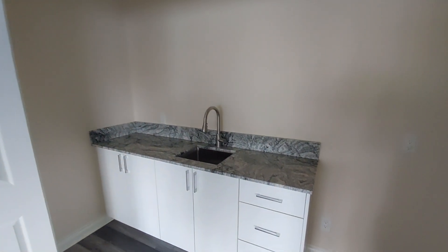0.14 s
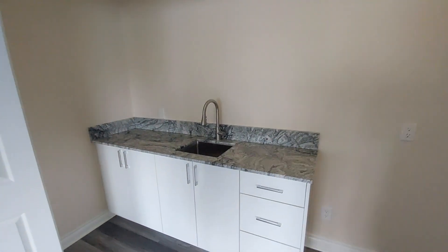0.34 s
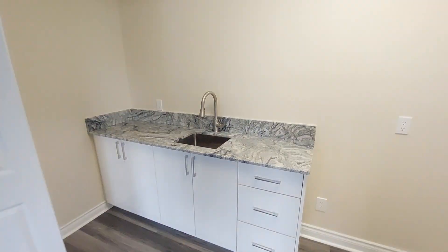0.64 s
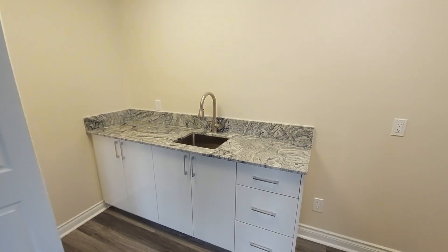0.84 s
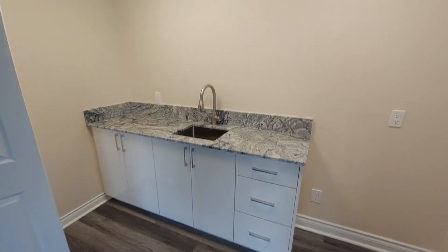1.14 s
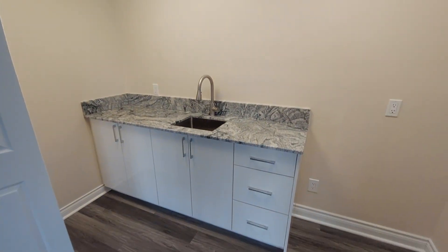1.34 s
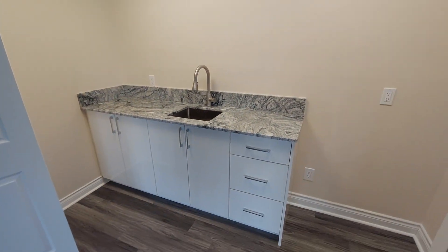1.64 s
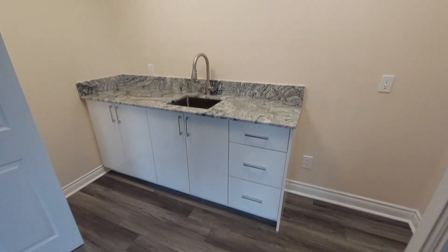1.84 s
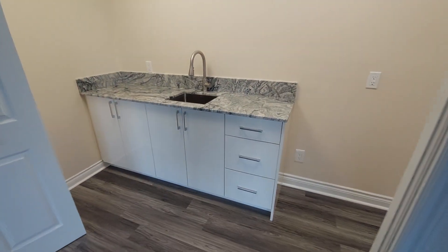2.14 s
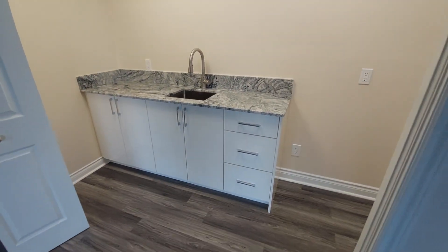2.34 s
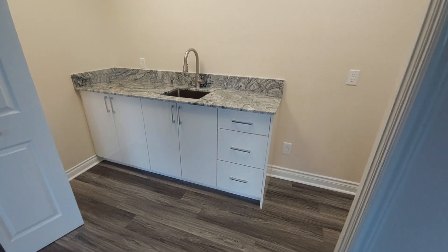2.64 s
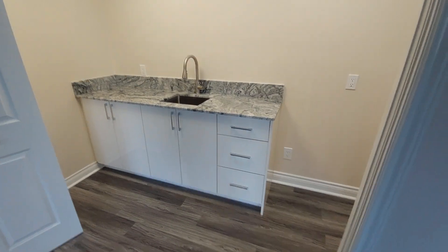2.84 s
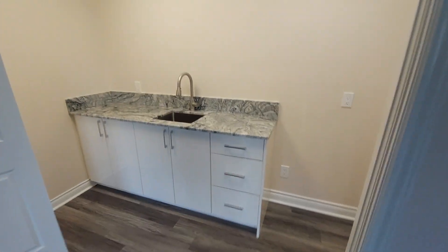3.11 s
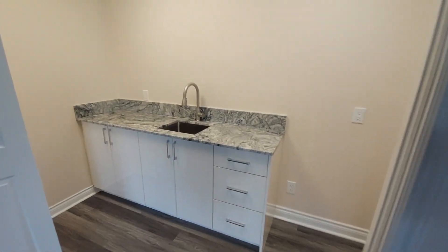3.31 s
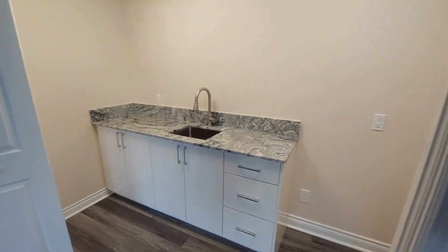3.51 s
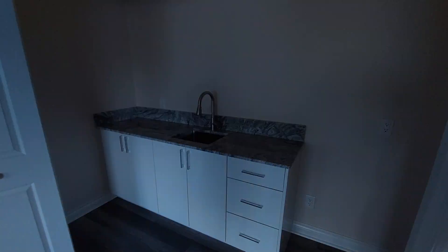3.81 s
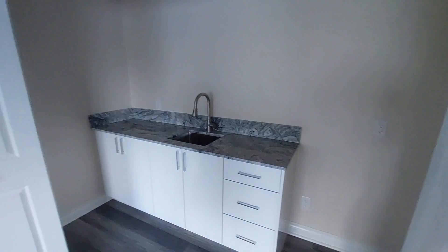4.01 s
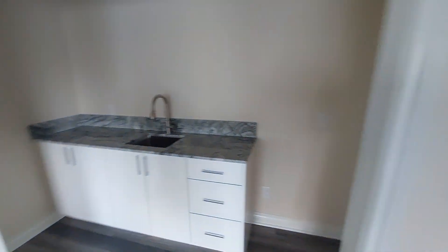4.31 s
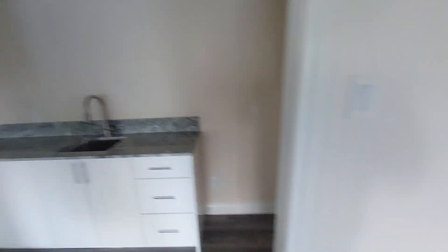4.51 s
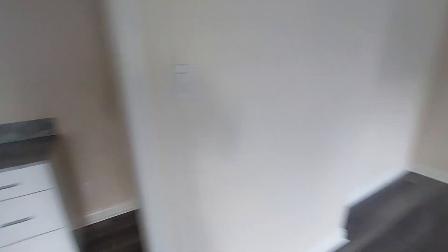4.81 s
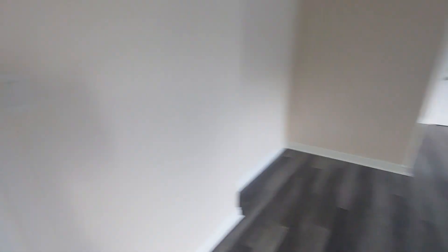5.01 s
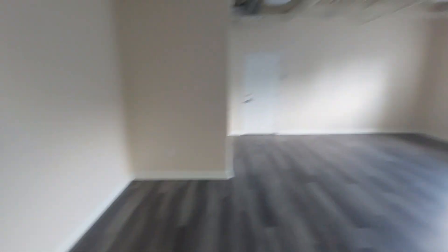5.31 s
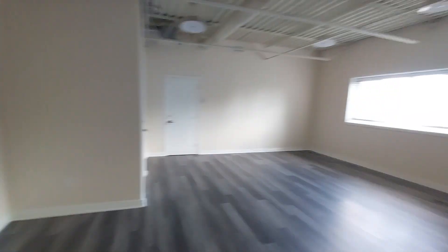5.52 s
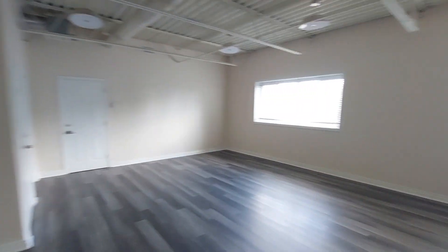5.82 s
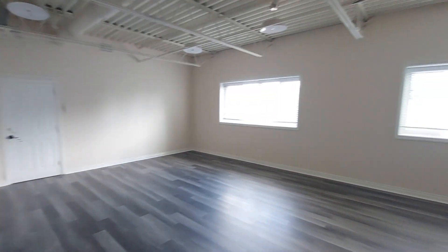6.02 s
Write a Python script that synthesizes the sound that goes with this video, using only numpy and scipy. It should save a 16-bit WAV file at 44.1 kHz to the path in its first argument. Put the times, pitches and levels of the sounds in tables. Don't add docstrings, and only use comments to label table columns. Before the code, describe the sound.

Close plastic clicks and skin rubs over faint hiss and hum, then steps, a wall switch snapping off, cloth rustle and one loud handling tap.

```python
import sys
import numpy as np
from scipy import signal
from scipy.fft import rfft, irfft
from scipy.io import wavfile
from scipy.ndimage import uniform_filter1d

SR = 44100
rng = np.random.default_rng(int(sys.argv[2]) if len(sys.argv) > 2 else 0)


def volts_from_decibels(level):
    exponent = np.asarray(level, float) / 20
    return 10 ** exponent


def master(y):
    cut = np.clip(np.atleast_2d(y).T, -1, 1)
    pcm = np.round(cut * 32767)
    wavfile.write(sys.argv[1], SR, pcm.astype(np.int16))


N = 271215
LEAD = 22050

# frequency in Hz, level in dB per Hz.
FLOOR_COLOUR = [(25, -29), (53, -17), (90, -25), (200, -21.5), (330, -28), (630, -39.5), (2000, -41),
                (5700, -58), (9500, -50), (12500, -63), (16000, -65)]
# frequency in Hz, width in Hz, level in dB.
MOTOR_LINES = [(113.4, 14, -68.5), (274, 57, -85)]
# time in seconds, hum gain in dB.
MOTOR_FADE = [
    (0, -1.5),
    (1.5, 0),
    (2.6, 2),
    (3.6, 4),
    (4.2, -0.5),
    (4.8, -8),
    (6.15, -12),
]
FLOOR_DB, TONE_HZ, TONE_DB = -71, 240.3, -73
# frequency in Hz, left-right correlation.
PORT_LIKENESS = [(60, 0.86), (240, 0.95), (950, -0.071), (3770, 0.092), (15000, -0.12)]
# frequency in Hz, left over right in dB.
PORT_BALANCE = [(60, 11), (180, 6.5), (550, 1), (1650, 5), (4970, 5), (15000, -1.5)]
# frequency in Hz, t60 in seconds.
ROOM_T60 = [(130, 1.3), (260, 0.86), (520, 0.85), (1000, 1.29), (2000, 2.05), (4000, 1.554), (8000, 0.97),
            (16000, 0.54)]

# frequency in Hz, level in dB per Hz.
CLOTH_COLOUR = [(1500, -4.5), (3300, -5.5), (4200, -1), (7500, -2.5), (9200, -9.5), (12500, -2.5),
                (15500, -4), (16500, -30.5)]
# fullest brush in seconds, level in dB, rise in dB per second, left over right in dB.
SWINGS = [(0, -71.5, 516, -4), (.92, -76, 55, 11.5), (1.85, -63.5, 693.5, 5.5), (2.1, -60, 791, 1.5),
          (2.45, -75, 60, 2), (2.7, -91, 60, 8), (3.0, -72, 77, 1), (3.3, -71, 8, 3), (3.52, -66.5, 102, 6),
          (3.7, -58, 128, -2), (4.24, -62.5, 150, -6), (4.58, -59.5, 904, -11.5), (4.88, -56, 400, 0.5),
          (5.14, -68, 100, 25), (5.6, -60, 122, 4.5), (5.73, -63.5, 160, 2), (5.945, -51.5, 996, 6.5),
          (6.04, -55, 187, 0.5)]
SWING_FALL_DB_PER_S, STILL_DB = 51, -85.5

# start in seconds, peak in dB, pitch in Hz, t60 in seconds.
THUDS = [(1.24, -59, 50, .9), (1.42, -58, 47, .5), (1.97, -59, 47, .4), (4.0, -56, 60, .5),
         (2.215, -31, 68, 0.19), (2.277, -35, 61.5, 0.1), (2.655, -41, 56.6, 0.064), (2.873, -45, 95, 0.22),
         (2.931, -35.5, 102, 0.12), (3.593, -43.5, 57.7, 0.45), (3.843, -37, 55, 0.29),
         (4.482, -43, 61.4, 0.15), (4.549, -43, 65.4, 0.11), (5.07, -52, 60.3, 0.7),
         (5.298, -56, 54.6, 0.43), (5.562, -40.5, 59, 0.13)]
# time in seconds, level in dB, heel boom in dB, sole brightness in dB, contact in seconds.
FOOTFALLS = [(2.0787, -29, -0.5, -8.5, 0.00029), (3.072, -50.5, 13, 9.5, 0.0016),
             (3.836, -32.5, 8.5, -11, 0.0091), (4.46, -48, 5.5, 0.5, 0.0042), (4.58, -49, -23, 10.5, 0.04),
             (4.76, -52.5, -19, 8.5, 0.04), (4.87, -47, -9, 3, 0.032), (5.2918, -38, 0.5, -4.5, 0.00044),
             (5.56, -49.5, -10, 3.5, 0.036), (5.69, -50.5, -15.5, 6, 0.055), (5.923, -40.5, 8.5, 1, 0.023)]
# frequency in Hz, level in dB per Hz.
SOLE_COLOUR = [(70, -22.5), (130, -17), (230, -5.5), (330, -7), (500, -7.5), (800, -8.5), (1400, -10.5),
               (1900, -8.5), (2700, -23), (9000, -35), (15000, -25), (17000, -97)]

# time in seconds, level in dB.
KNOCKS = [
    (3.574, -39),
    (3.579, -34),
    (3.6, -35.5),
    (4.87, -53),
    (5.64, -57),
]
# frequency in Hz, level in dB per Hz.
WALL_COLOUR = [(88, -37), (150, -12), (315, -3.5), (420, -13), (730, -8), (1100, -12.5), (3840, -10.5),
               (4490, -13.5), (9630, -25), (12200, -16.5), (16000, -21.5)]
# frequency in Hz, width in Hz, level in dB.
PLATE_MODES = [(3840, 290, -0.5), (6970, 700, 7)]
# frequency in Hz, level in dB, t60 in seconds.
CAVITY_MODES = [(533, -9, .3), (641, -9, .6), (744, -15, 1.1), (753, 4, .18), (860, -11, .3),
                (958, -18, .6)]
# time in seconds, level in dB.
CAVITY_HITS = [
    (3.578, -36),
    (4.87, -54),
    (5.64, -58),
]

# time in seconds, level in dB.
SWITCH_OFF = [
    (3.8155, -52.5),
    (3.8284, -25.5),
    (3.8300, -29),
    (3.8352, -36),
    (3.8372, -39),
]
# time in seconds, level in dB.
SWITCH_ON = [
    (-0.27, -25),
]
# frequency in Hz, level in dB per Hz.
OFF_COLOUR = [(200, -65), (600, -37.5), (1000, -27), (1600, -14), (2100, -18), (2700, -18), (3450, -13),
              (4700, -17), (6400, -16), (7700, -13), (8900, -29), (12000, -12), (15500, -13), (16500, -38)]
# frequency in Hz, level in dB per Hz.
ON_COLOUR = [(150, -6), (250, -7.5), (480, 3), (800, -19.5), (1600, -6), (2200, -9), (3100, -16.5),
             (3850, -4.5), (4500, -14), (7500, -20), (9000, -32), (15500, -40), (17000, -65)]
# frequency in Hz, width in Hz, level in dB.
SPRING_MODES = [(3450, 300, 6), (6360, 110, 16), (6670, 150, 4), (7580, 200, 2), (8050, 34, 7),
                (4130, 150, 3), (5100, 400, -1), (1620, 350, -3)]

# time in seconds, left over right in dB.
GRIP = [(.12, 28), (.36, 20), (.42, -15), (.5, -13), (.56, 27), (.74, 72), (1.05, 52), (1.46, 59),
        (1.8, 51), (2.2, 31.5), (2.66, 30), (2.89, 68), (2.935, -22), (2.96, 17), (5.05, -9.5), (5.19, -17),
        (5.23, 40), (5.44, 68)]
# frequency in Hz, width in Hz, level in dB.
CASE_MODES = [(1650, 1070, 7.5), (1150, 950, 0), (2316, 350, -21), (5200, 1580, -32.5)]
# frequency in Hz, level in dB per Hz.
SKIN_COLOUR = [(1500, -10), (3000, -1.5), (6000, -7), (9200, -11), (12600, -8), (15500, -12.5),
               (16500, -12)]
# start in seconds, hold in seconds, rub in dB, hiss in dB, boom in dB.
SLIDES = [(0.353, 0.12, -68.5, -77.5, -100), (0.594, 0.0061, -64, -63.5, -62),
          (0.684, 0.093, -56.5, -62, -73), (.848, 0.076, -44.5, -63, -61.5),
          (1.042, 0.034, -60.5, -66.5, -108), (1.976, 0.089, -59, -57.5, -79),
          (2.601, 0.014, -73, -67, -96), (2.665, 0.04, -58.5, -60, -93), (2.938, 0.026, -54, -62.5, -47.5),
          (5.098, 0.087, -60.5, -61, -66), (5.415, 0.019, -52, -52, -55), (5.465, 0.01, -60, -71.5, -71)]
SLIDE_RISE_DB_PER_S, SLIDE_FALL_DB_PER_S = 497.5, 1000
# start in seconds, hold in seconds, rub in dB, hiss in dB, boom in dB.
PRESSES = [
    (1.41, 0.066, -55, -65, -49.5),
    (1.784, 0.017, -49.5, -58.5, -58),
    (2.861, 0.0027, -99, -58, -49),
    (2.893, 0.0044, -90.5, -68, -49),
    (2.911, 0.004, -60, -73, -42),
    (5.205, 0.0047, -70, -85, -56),
    (5.227, 0.045, -61.5, -82, -56.5),
    (5.298, .09, -81, -78, -59.5),
]
PRESS_RISE_DB_PER_S, PRESS_SAG_DB_PER_S, PRESS_FALL_DB_PER_S = 30000, 195, 2500

# time in seconds, peak in dB, case ring in Hz, cycles to die.
PAD_TICKS = [(0.12, -27.5, 1680, 4.8), (0.361, -31, 1840, 5.1), (0.673, -40, 1650, 7),
             (0.743, -22, 1400, 5.2), (0.828, -34.5, 1330, 10), (0.837, -35, 1200, 12),
             (1.4297, -27.5, 1650, 4.4), (2.9568, -40, 4100, 5), (5.4133, -38, 5200, 8),
             (5.4155, -38, 5600, 6), (5.4038, -46, 5000, 8), (5.4195, -24, 4600, 4), (2.8815, -52, 1600, 6),
             (2.9035, -48, 1400, 6), (2.588, -50, 1250, 8), (1.4015, -55, 1700, 5), (1.4145, -42, 1800, 5),
             (1.4565, -46, 1900, 6), (5.2925, -38, 900, 3), (5.054, -42.5, 1350, 9.8),
             (5.071, -29.5, 1810, 2.3), (5.431, -6.7, 1010, 2.8), (5.438, -23, 1480, 2.1),
             (1.4324, -42, 1100, 2.5), (1.4365, -39.5, 1200, 1.9), (2.9205, -40, 1310, 3.5),
             (1.781, -31, 1780, 8.5), (4.841, -49.5, 1440, 10)]
# time in seconds, peak in dB, case ring in Hz, cycles to die, crack against ring in dB.
NAIL_TICKS = [(0.553, -50, 1320, 6.3, -16), (0.593, -45, 1750, 6.5, -16), (1.015, -52, 1540, 6.1, -16),
              (1.3026, -28, 1760, 7, -12), (1.3445, -34, 1670, 6.5, -18), (1.411, -26.5, 2040, 4.5, -16),
              (1.4164, -35, 1810, 7, -12), (1.4471, -27, 1650, 5, -20), (1.4695, -20.5, 1680, 6, -18),
              (1.7795, -27, 1700, 3.5, -16), (2.178, -28, 1430, 2.7, -16), (2.289, -34, 1520, 4.6, -16),
              (2.628, -42, 1200, 8, -14), (2.646, -36, 1360, 6.2, -18), (2.658, -36, 1340, 6.6, -18),
              (2.861, -28, 1650, 7, -12), (2.8929, -26, 2070, 6, -11), (2.9115, -26, 1950, 6, -10),
              (2.9400, -34, 1210, 3, -24), (5.048, -37, 1610, 3.7, -12), (5.233, -26, 1850, 3.4, -12),
              (5.42, -18.5, 1400, 2.4, -16), (2.9597, -26, 1900, 5, -20)]
PAD_CRACK_DB, NAIL_LAG_S = -25, 0.0004
PAD_SWELL, NAIL_SWELL = 0.055, 0.12
# time in seconds, peak in dB.
SNAPS = [(0.666, -16), (.586, -36.5), (1.388, -54), (1.401, -65), (1.997, -45), (2.881, -42), (2.902, -50),
         (5.305, -50), (5.311, -50), (5.322, -33), (5.347, -42), (5.3723, -15.5)]
# frequency in Hz, width in Hz, level in dB.
SNAP_MODES = [(13520, 3900, 6.5), (11660, 6600, -5.5), (5950, 940, -13.5)]


def unit(x):
    return x / np.sqrt(np.mean(x ** 2) + 1e-30)


def in_time(rows):
    s, *columns = np.transpose(rows)
    return [np.interp(np.arange(N) / SR, s, c) for c in columns]


def at_hz(points, hz):
    point_hz, value = np.transpose(points)
    return np.interp(np.log(np.maximum(hz, 1)), np.log(point_hz), value)


def pan(x, db):
    right = volts_from_decibels(-np.asarray(db))
    return np.array([2 * x / (1 + right), 2 * x * right / (1 + right)])


def add(out, s, sound):
    i = round(s * SR)
    out[..., i:i + sound.shape[-1]] += sound[..., :out.shape[-1] - i]


def resonate(x, hz, width):
    r = np.exp(-np.pi * width / SR)
    zeros = np.array([1, 0, -1]) * (1 - r * r) / 2
    poles = [1, -2 * r * np.cos(2 * np.pi * hz / SR), r * r]
    return signal.lfilter(zeros, poles, x)


def resonate_twice(x, hz, width):
    return resonate(resonate(x, hz, width), hz, width)


def causal(spectrum, size=4096):
    cepstrum = irfft(np.log(volts_from_decibels(at_hz(spectrum, np.fft.rfftfreq(size, 1 / SR)))))
    cepstrum[1:size // 2] *= 2
    cepstrum[size // 2 + 1:] = 0
    pulse = irfft(np.exp(rfft(cepstrum)))
    return pulse / np.sqrt(np.sum(pulse ** 2))


def envelope(s, hold, rise, sag, fall):
    t = np.arange(0, N + 16, 16) / SR
    db = rise * np.minimum(t - s, 0)
    db = db - sag * np.clip(t - s, 0, hold)
    db = db - fall * np.maximum(t - s - hold, 0)
    return np.interp(np.arange(N) / SR, t, volts_from_decibels(np.maximum(db, -120)))


def fibres(spectrum):
    grit = rng.standard_normal((2, N)) * volts_from_decibels(2.7 * rng.standard_normal((2, N)))
    return unit(signal.fftconvolve(grit, causal(spectrum)[None])[:, :N])


def diffuse(size):
    hz = np.fft.rfftfreq(size, 1 / SR)
    mid, side = rfft(rng.standard_normal((2, size)))
    alike = np.clip(at_hz(PORT_LIKENESS, hz), -1, 1)
    pair = np.sqrt(1 + alike) * mid + np.sqrt(1 - alike) * side * [[1], [-1]]
    return pair * volts_from_decibels(at_hz(PORT_BALANCE, hz) / 2 * np.array([[1], [-1]])), hz


def background():
    field, hz = diffuse(N)
    lines = 0
    for line_hz, width, db in MOTOR_LINES:
        lines = lines + volts_from_decibels(2 * db) / width / (1 + (2 * (hz - line_hz) / width) ** 2) ** 2
    waver = np.cumsum(uniform_filter1d(rng.standard_normal(N), size=4000)) * 60.0 / SR
    tone = volts_from_decibels(TONE_DB) * np.sqrt(2) * np.sin(2 * np.pi * (TONE_HZ * np.arange(N) / SR + waver))
    hum = irfft(field * np.sqrt(lines * SR / 3), N) + pan(tone, 6.6)
    hiss = unit(irfft(field * volts_from_decibels(at_hz(FLOOR_COLOUR, hz)), N))
    return volts_from_decibels(FLOOR_DB) * hiss + hum * volts_from_decibels(in_time(MOTOR_FADE)[0])


def room(x):
    size = 2 * SR
    field, hz = diffuse(size)
    t, tail = np.arange(size) / SR, 0
    for octave in np.arange(6, 15):
        share = np.clip(1 - np.abs(np.log2(np.maximum(hz, 1)) - octave), 0, 1)
        t60 = np.clip(at_hz(ROOM_T60, 2. ** octave), .1, 3)
        tail = tail + irfft(field * share) * volts_from_decibels(-60 * t / t60)
    tail = tail * (1 - np.exp(-t / 0.00096)) * (1 + 0.09 * volts_from_decibels(-60 * t / 0.39))
    tail = tail / np.sqrt(np.sum(tail ** 2) / 2)
    return signal.fftconvolve(x[None], tail)[:, LEAD:LEAD + N]


def rustle():
    power = volts_from_decibels(STILL_DB) ** 2
    for s, db, rise, side_db in SWINGS:
        brush = volts_from_decibels(db) * envelope(s, 0, rise, 0, SWING_FALL_DB_PER_S)
        power = power + pan(brush, side_db) ** 2
    return np.sqrt(power) * fibres(CLOTH_COLOUR)


def thuds():
    out, t = np.zeros(N), np.arange(SR // 2) / SR
    for s, db, hz, t60 in THUDS:
        wave = np.sin(2 * np.pi * hz * t) + 0.73 * np.sin(2 * np.pi * 1.7 * hz * t)
        add(out, s, volts_from_decibels(db - 60 * t / t60) * (1 - np.exp(-t / 0.0036)) ** 2 * wave)
    left, right = pan(out, 7.8)
    return np.array([left, np.roll(right, 120)])


def blows(rows, spectrum, length):
    out = np.zeros(N + LEAD)
    for (s, db), shares in zip(rows, rng.uniform(.05, .35, (len(rows), 5))):
        burst = signal.unit_impulse(8000)
        for lag in 1 + (shares * length * SR).astype(int):
            echo = np.r_[1, np.zeros(lag - 1), -.6]
            burst = signal.lfilter(echo[::-1], echo, burst)
        add(out, s + LEAD / SR, volts_from_decibels(db) * burst)
    return signal.fftconvolve(out, causal(spectrum))[:N + LEAD]


def steps():
    hz, db = np.transpose(SOLE_COLOUR)
    out = 0
    for s, level_db, boom_db, bright_db, roll in FOOTFALLS:
        colour = np.c_[hz, db + boom_db * (hz < 600) + bright_db * (hz > 1650)]
        out = out + blows([(s, level_db)], colour, roll)
    return out


def wall():
    hit = blows(KNOCKS, WALL_COLOUR, 0.0065)
    return hit + sum(volts_from_decibels(db) * resonate(hit, hz, width) for hz, width, db in PLATE_MODES)


def cavity():
    out, t = np.zeros(N), np.arange(SR) / SR
    ring = sum(volts_from_decibels(db - 60 * t / t60) * np.sin(2 * np.pi * hz * t) for hz, db, t60 in CAVITY_MODES)
    for s, db in CAVITY_HITS:
        add(out, s, volts_from_decibels(db) * (1 - np.exp(-t / 0.028)) ** 2 * ring)
    return pan(out, 1.5)


def sprung(x):
    return x + sum(volts_from_decibels(db) * resonate(x, hz, width) for hz, width, db in SPRING_MODES)


def switch():
    off = sprung(blows(SWITCH_OFF, OFF_COLOUR, .0015))
    one_blow = sprung(blows([(3.8284, -23.5)], OFF_COLOUR, .0015))
    return off, one_blow + blows(SWITCH_ON, ON_COLOUR, 0.0018)


def rubs():
    slips = (rng.random(N) < 8000 / SR) * volts_from_decibels(3.7 * np.minimum(rng.exponential(1, N), 5))
    slips = slips * rng.choice([-1, 1], N)
    shaken = 0
    for k, (hz, width, db) in enumerate(CASE_MODES):
        shaken = shaken + (-1) ** k * volts_from_decibels(db) * resonate_twice(slips, hz, width)
    boom = unit(resonate_twice(rng.standard_normal(N), 390, 380))
    layers = np.array([unit(shaken), fibres(SKIN_COLOUR)[0], boom])
    gains = np.zeros((3, N))
    for s, hold, *dbs in SLIDES:
        slide = envelope(s, hold, SLIDE_RISE_DB_PER_S, 0, SLIDE_FALL_DB_PER_S)
        gains += np.outer(volts_from_decibels(dbs), slide)
    for s, hold, *dbs in PRESSES:
        press = envelope(s, hold, PRESS_RISE_DB_PER_S, PRESS_SAG_DB_PER_S, PRESS_FALL_DB_PER_S)
        gains += np.outer(volts_from_decibels(dbs), press)
    return pan(np.sum(gains * layers, axis=0), in_time(GRIP)[0])


def crack(grit, low_hz, ring_hz, width, t60):
    burst = grit * volts_from_decibels(-60 * np.arange(len(grit)) / SR / t60)
    burst = burst + 1.7 * resonate(burst, ring_hz, width)
    burst = signal.sosfilt(signal.butter(4, low_hz, "high", fs=SR, output="sos"), burst)
    return burst / np.abs(burst).max()


def snap():
    click = signal.unit_impulse(900)
    rings = sum(volts_from_decibels(db) * resonate_twice(click, hz, width) * SR / width for hz, width, db in SNAP_MODES)
    return rings / np.abs(rings).max()


def ticks():
    out, t = np.zeros(N), np.arange(900) / SR
    recoil = -np.sin(2 * np.pi * 260 * t) * volts_from_decibels(-60 * t / 0.008) * (1 - np.exp(-t / 0.0013))
    pads = [(*row, PAD_CRACK_DB, 0, PAD_SWELL) for row in PAD_TICKS]
    nails = [(*row, NAIL_LAG_S, NAIL_SWELL) for row in NAIL_TICKS]
    for s, db, hz, cycles, crack_db, lag, swell in pads + nails:
        t60 = max(cycles, 1) / hz
        turns = hz * (t + 0.000084 * (1 - np.exp(-t / 0.0001)))
        body = np.sin(2 * np.pi * turns) * volts_from_decibels(-60 * t / t60) * (1 - np.exp(-t / (swell * t60)))
        add(out, s + lag, volts_from_decibels(db) * (body / np.abs(body).max() + volts_from_decibels(-10.5) * recoil))
        bright = crack(rng.standard_normal(900), min(2.1 * hz, 12000), min(4.2 * hz, 15000), 2500, 0.0008)
        add(out, s, volts_from_decibels(db + crack_db + 10.0) * bright)
    for s, db in SNAPS:
        add(out, s, volts_from_decibels(db) * snap())
    return pan(out, in_time(GRIP)[0])


def scene():
    feet, knock, (off, echoed) = steps(), wall(), switch()
    dull = signal.sosfilt(signal.butter(2, 4500, fs=SR, output="sos"), off)
    clack = volts_from_decibels(-2.0) * pan(dull, 0.5) + volts_from_decibels(-1.0) * pan(off - dull, -13.0)
    direct = volts_from_decibels(-10.5) * pan(feet, 3.1) + volts_from_decibels(-7.0) * pan(knock, -4.1) + clack
    far = volts_from_decibels(23) * (room(feet + knock + echoed) + direct[:, LEAD:])
    return background() + far + rustle() + thuds() + cavity() + rubs() + ticks()


def roll_off(x):
    return signal.sosfilt(signal.butter(12, 17150, fs=SR, output="sos"), x)


def record(dry):
    heard = signal.sosfilt(signal.butter(2, 42, "high", fs=SR, output="sos"), dry)
    heard = signal.sosfilt(signal.cheby2(10, 60, 17300, fs=SR, output="sos"), heard)
    return roll_off(heard)


dry = scene()
out = record(dry)
master(out)
```